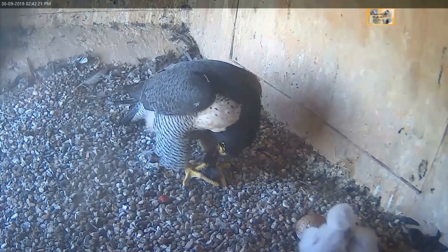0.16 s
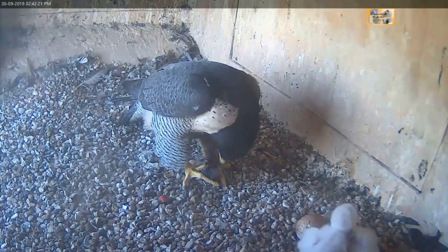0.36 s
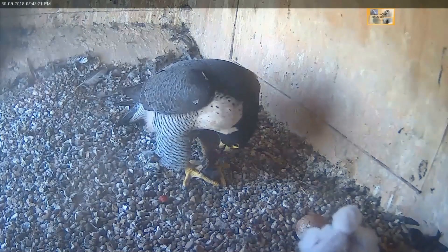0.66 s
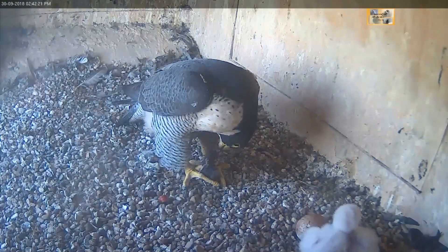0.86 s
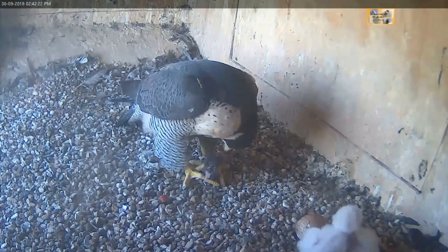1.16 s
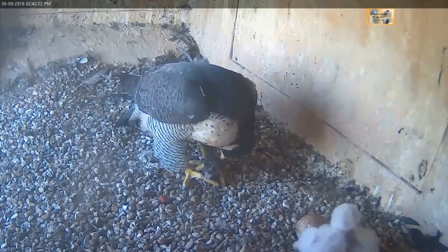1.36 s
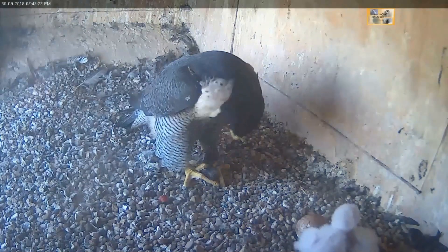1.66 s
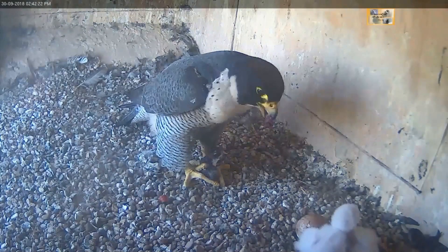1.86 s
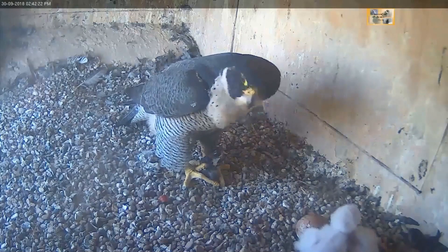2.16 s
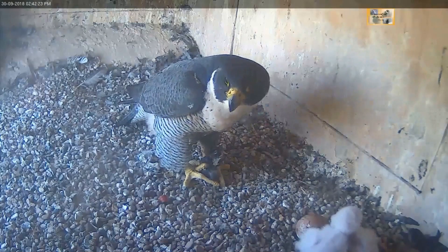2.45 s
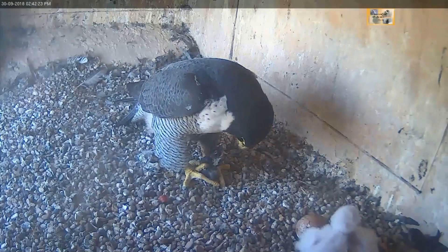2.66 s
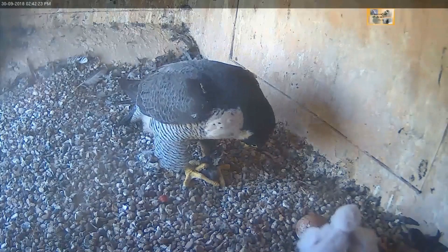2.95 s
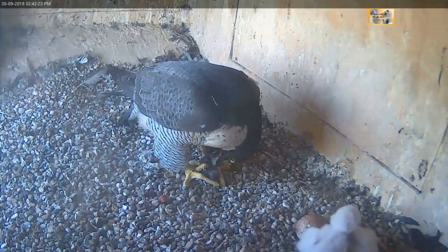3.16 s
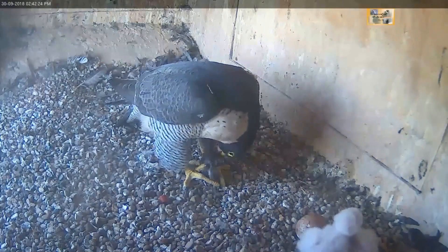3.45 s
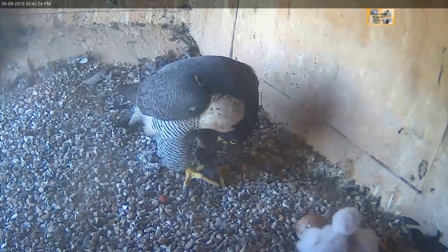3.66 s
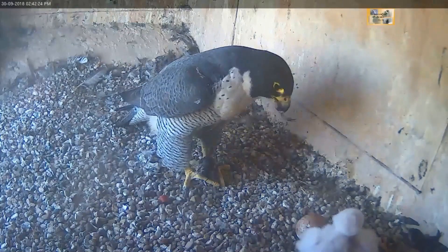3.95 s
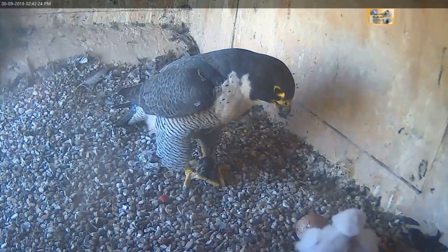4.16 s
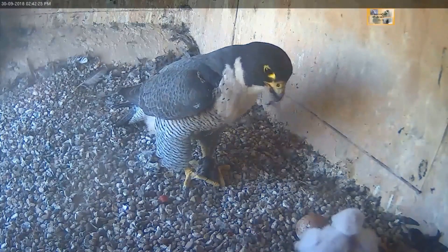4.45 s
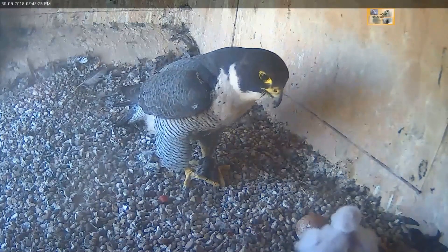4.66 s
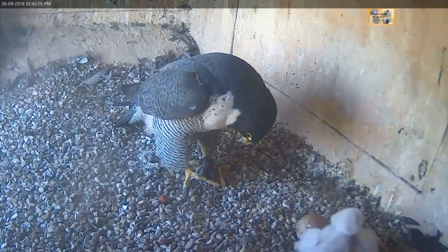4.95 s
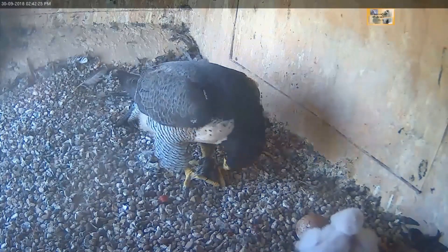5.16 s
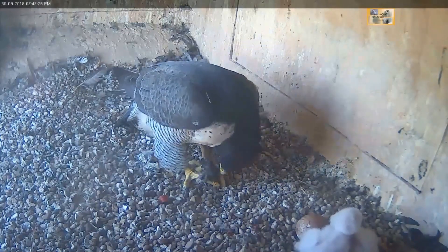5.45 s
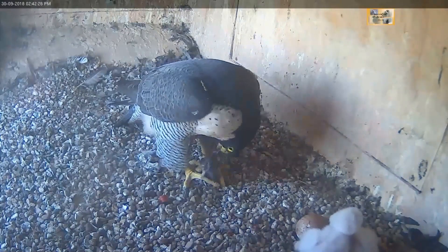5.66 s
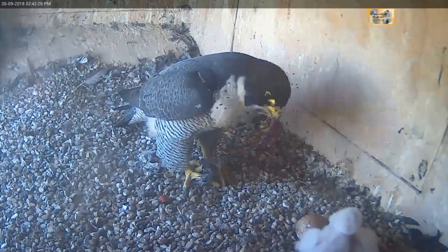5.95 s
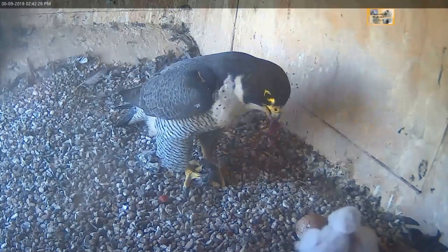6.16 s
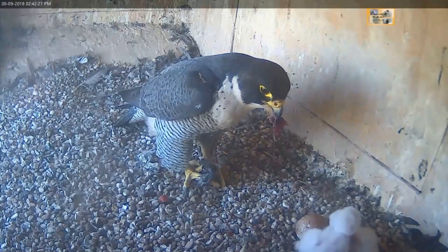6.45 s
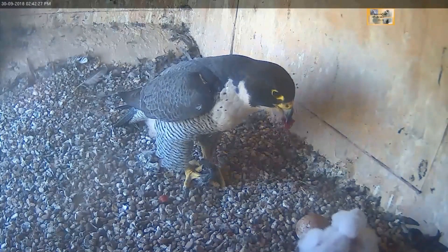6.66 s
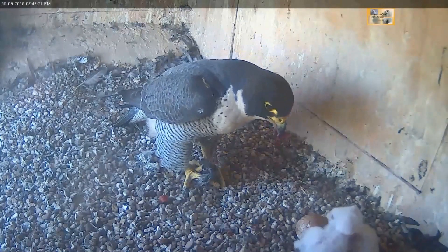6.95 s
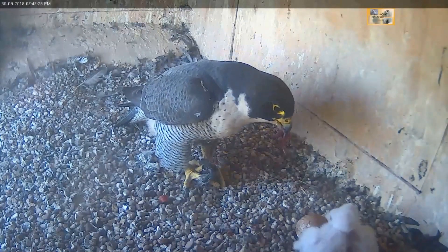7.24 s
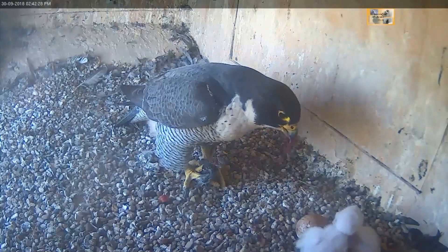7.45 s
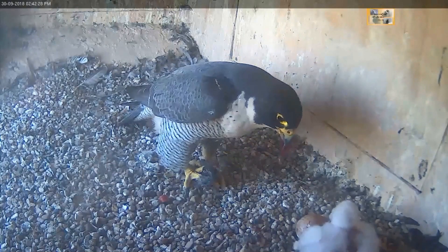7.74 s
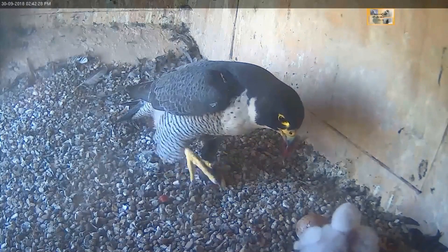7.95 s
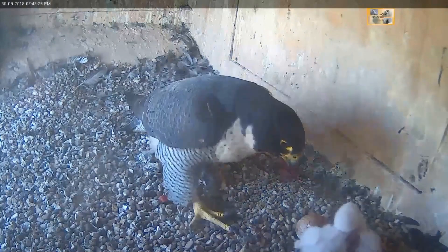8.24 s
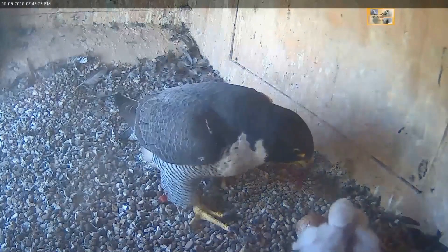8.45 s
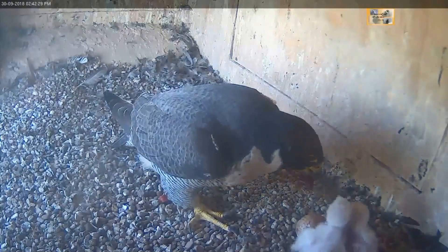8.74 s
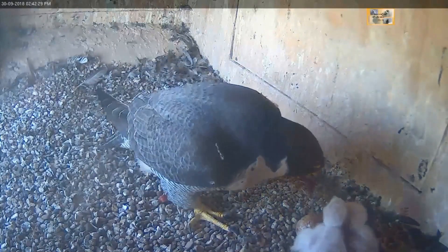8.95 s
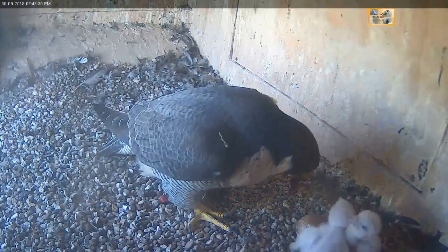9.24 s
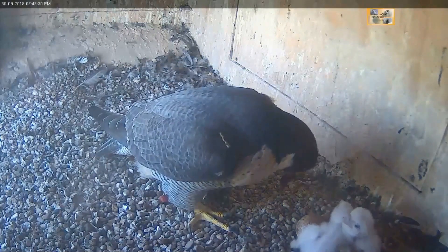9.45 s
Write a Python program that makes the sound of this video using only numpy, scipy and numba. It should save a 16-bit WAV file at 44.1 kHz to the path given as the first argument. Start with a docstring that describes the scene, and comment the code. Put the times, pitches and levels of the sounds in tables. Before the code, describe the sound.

Inside a wooden nest box, small chicks beg with brief, high, slightly rough cheeps above steady low rumble, hiss and a thin high whine. The mother falcon's tugs at prey shake and thump the floor, with tiny beak and pebble clicks. After six seconds she gives loud, rasping, whistling chups that ring close to the small microphone; then a foot scuffs gravel while the cheeping continues.

```python
"""A falcon feeds her downy chicks in a wooden nest box, heard by the box's small camera.
From the start the chicks beg in arching two-voiced cheeps over a steady rumble, hiss and thin whine.
Her tugs at the prey shake and thump the floor, with small clicks of beak and pebbles.
Past 6 s come three loud chups, pulsed rasps with whistles: the housing rings, the camera's gain ducks.
Last, her foot drags through the gravel, and the chicks cheep on while the gain slowly recovers."""
import sys
import numpy as np
from scipy import signal
from scipy.fft import rfft, irfft
from scipy.io import wavfile
from numba import njit

SR = 44100
rng = np.random.default_rng(int(sys.argv[2]) if len(sys.argv) > 2 else 0)


def persist_wave(psi):
    """Save psi, clipped to +-1, as 16-bit WAV."""
    counts = np.round(np.clip(psi, -1, 1) * 32767).astype(np.int16)
    wavfile.write(sys.argv[1], SR, np.atleast_2d(counts).T)


N = 423360  # samples, 9.6 s


def undb(db):
    """Decibels to amplitude gain."""
    return 10 ** (np.asarray(db) / 20)


def unit(x):
    """Scale to rms 1."""
    return x / np.sqrt(np.mean(x ** 2))


def span(length_s):
    """Sample times [s] over a length."""
    return np.arange(int(length_s * SR)) / SR


def add(out, start_s, x):
    """Mix a sound in at a time, cut at the end of the scene."""
    i = int(start_s * SR)
    out[i:i + len(x)] += x[:len(out) - i]


def noise(size):
    """White noise, spread 1."""
    return rng.standard_normal(size)


def colour(x, points):
    """Filter by a (frequency [Hz], gain [dB]) curve, straight on a log frequency axis."""
    hz, db = np.transpose(points)
    f = np.maximum(np.fft.rfftfreq(len(x), 1 / SR), 1)
    gain = undb(np.interp(np.log(f), np.log(hz), db))
    return irfft(rfft(x) * gain, len(x))


def resonate(x, hz, width_hz):
    """One resonance, gain 1 at its centre."""
    return signal.lfilter(*signal.iirpeak(hz, hz / width_hz, fs=SR), x)


def flutter(size, rate_hz):
    """Low-passed noise, rms 1: a smooth random wander."""
    lowpass = signal.butter(2, rate_hz, fs=SR, output="sos")
    settled = signal.sosfilt(lowpass, noise(size + SR // 10))[-size:]
    return unit(settled)


def fade(t, t60_s):
    """Exponential decay, -60 dB at t60."""
    return np.exp(-np.log(1000) * t / t60_s)


def envelope(t, attack_s, hold_s, t60_s):
    """Linear attack, hold and exponential release."""
    return np.clip(t / attack_s, 0, 1) * fade(np.maximum(t - attack_s - hold_s, 0), t60_s)


def ring(modes, length_s):
    """Impulse response of a set of modes: a sum of decaying sines."""
    t = span(length_s)
    return sum(undb(db) * fade(t, t60_s) * np.sin(2 * np.pi * hz * t) for hz, db, t60_s in modes)


def box(x, wet_db, t60_s):
    """Direct sound plus the quick, dense echoes of the close walls: decaying noise after 2 ms."""
    t = span(t60_s)
    echoes = noise(len(t)) * fade(t, t60_s) * (t > .002)
    echoes = echoes / np.linalg.norm(echoes)
    return x + undb(wet_db) * signal.fftconvolve(x, echoes)[:len(x)]


def voice(hz, jitter, shimmer, overtone_db, slope_db, flutter_hz):
    """One vibrating membrane of the syrinx: a wavering tone with overtones 2 to 5."""
    wavering_hz = hz * (1 + jitter * flutter(len(hz), flutter_hz))
    phase = 2 * np.pi * np.cumsum(wavering_hz) / SR
    overtones = sum(undb(overtone_db + slope_db * (k - 3)) * np.sin(k * phase) * (k * hz < SR / 4)
                    for k in range(2, 6))
    return np.sqrt(2) * (np.sin(phase) + overtones) * (1 + shimmer * flutter(len(hz), flutter_hz))


# chick cheeps: (time [s], rise [s], fall [s], tail [s], top [Hz], end [Hz],
# relative level [dB], roughness [0-1])
CHICK_CHEEPS = [ (.128, .034, 0.026, 0.029, 5800, 1850, -34, 0.14),
                (.506, .039, 0.025, .020, 5950, 1910, -30.5, 0.13),
                (.819, .029, 0.025, 0.045, 5600, 1440, -34, 0.43),
                (.982, .021, .025, 0.03, 5850, 2020, -32.5, 0.2),
                (1.565, .022, 0.021, 0.021, 5250, 1910, -35, 0.33),
                (2.129, .027, 0.023, 0.021, 5650, 1860, -32.5, 0.25),
                (2.581, .054, 0.02, 0.024, 5600, 1800, -34.5, .3),
                (2.885, .043, 0.04, 0.04, 5650, 1785, -36, 0.68),
                (2.999, .045, .027, 0.018, 3850, 2020, -36, .08),
                (3.046, .025, 0.025, .020, 5650, 1810, -33.5, .35),
                (3.384, .054, 0.031, 0.041, 5600, 1693, -34, 0.64),
                (3.619, .023, .020, 0.022, 5250, 2180, -33.5, 0.36),
                (3.967, .026, 0.032, 0.049, 5600, 1663, -30, 0.5),
                (4.053, 0.026, 0.015, 0.023, 4800, 2100, -37, 0.37),
                (4.583, .031, 0.03, 0.047, 5600, 1482, -31.5, 0.38),
                (4.706, .027, 0.017, 0.021, 4950, 1780, -35.5, .29),
                (5.173, .030, 0.038, 0.045, 5500, 1440, -33.5, 0.47),
                (5.573, .028, .017, 0.033, 4500, 1630, -37.5, .08),
                (6.183, .029, 0.02, 0.027, 5350, 1720, -35.5, 0.2),
                (6.752, .046, 0.023, 0.034, 5500, 1632, -34, 0.54),
                (7.181, .057, 0.017, 0.011, 5600, 2250, -33.5, 0.4),
                (7.208, .057, 0.027, .041, 5700, 1713, -35, .7),
                (7.332, .030, .016, .014, 3410, 2020, -34.5, 0),
                (7.515, .043, .020, .014, 5700, 1860, -32.5, .22),
                (7.687, .051, 0.036, 0.04, 5700, 1678, -32.5, 0.63),
                (7.929, .029, 0.024, 0.022, 6200, 1573, -30, .28),
                (8.146, .044, 0.031, 0.036, 5800, 1444, -31, 0.49),
                (8.366, .022, 0.025, .024, 5950, 1950, -31, 0.19),
                (8.745, .040, .025, 0.042, 5200, 1516, -31.5, 0.48),
                (8.819, .032, 0.017, 0.025, 5950, 1310, -26.5, .3),
                (9.361, .040, .031, 0.034, 6100, 1380, -25, .29),
                (9.429, .025, 0.029, 0.062, 5800, 1502, -30.5, 0.34)]
# chick's throat and open beak: (frequency [Hz], gain [dB])
BEAK_RESPONSE = [(800, -8.5), (1500, 7), (2300, -8.5), (3000, 5), (4500, -9), (5700, -1.5), (6800, -2.5),
                 (8000, -33)]


def chicks():
    """All the cheeps, coloured by throat and beak, echoing from the far corner of the box."""
    out = np.zeros(N)
    for start_s, *shape in CHICK_CHEEPS:
        add(out, start_s, cheep(*shape))
    return undb(-4.5) * box(colour(out, BEAK_RESPONSE), wet_db=-0.5, t60_s=0.058)


BREAK_HZ, LOW_VOICE_HZ = 3002, 4154  # pitch between fall and tail; mean ceiling of the slacker side
# start pitch as a share of the top: the longer the rise, the lower it starts
CHEEP_START_SHARE, START_SHARE_PER_S = .70, 4.2
CLEAN_TAIL_DB, ROUGH_TAIL_DB = -18, 16.5  # at roughness 0 and 1: harsh cries hold on longer
# slacker side: level, wander of its ceiling (share); unevenness of both sides
SLACK_SIDE_DB, SLACK_WANDER, PATCHY_DB = -6.5, 0.0397, 2.5


def cheep(rise_s, fall_s, tail_s, top_hz, end_hz, db, rough):
    """Pitch arches up and drops to a low tail; under strain the syrinx's sides part and turn harsh."""
    top_s, fall_end_s, end_s = np.cumsum([rise_s, fall_s, tail_s])
    t = span(end_s)
    crest_s = top_s - .016 * rough  # a harsh cry tops out early and holds there

    start_hz = top_hz * (CHEEP_START_SHARE - START_SHARE_PER_S * rise_s)
    climb = np.sin(np.pi / 2 * np.clip(t / crest_s, 0, 1)) ** 1.6
    rise = start_hz + (top_hz - start_hz) * climb
    drop = top_hz - (top_hz - BREAK_HZ) * np.clip((t - top_s) / fall_s, 0, 1) ** 1.45
    tail = end_hz + (BREAK_HZ - end_hz) * np.exp(-np.maximum(t - fall_end_s, 0) / .0095)
    hz = np.where(t < top_s, rise, np.where(t < fall_end_s, drop, tail))

    # the slacker side cannot follow to the top
    limit_hz = LOW_VOICE_HZ * (1 + SLACK_WANDER * flutter(len(t), 29.8))
    low_hz = hz / (1 + (hz / limit_hz) ** 8) ** (1 / 8)

    strain = np.interp(t, [0, top_s, fall_end_s, fall_end_s + .022], [0.15, 1, 1.4, 0.093])
    rough_strain = rough * strain
    high = voice(hz, 0.0025 + 0.078 * rough_strain, 0.41 * rough_strain,
                 overtone_db=-7, slope_db=-1.5, flutter_hz=750)
    low = voice(low_hz, .005 + .09 * rough_strain, .5 * rough_strain,
                overtone_db=-13, slope_db=-6, flutter_hz=600)
    high_patches = undb(PATCHY_DB * flutter(len(t), 120))
    low_patches = undb(SLACK_SIDE_DB + PATCHY_DB * flutter(len(t), 120))
    tones = high * high_patches + strain * low * low_patches

    # chaotic vibration fills the gaps between the tones
    chaos = unit(colour(noise(len(t)), [(900, -24), (1600, -3), (2300, -2), (3000, -2.5),
                                        (5800, -0.5), (7500, -6.5)]))
    harsh = rough ** 2 * np.interp(t, [crest_s - .02, crest_s, fall_end_s, fall_end_s + 0.022],
                                   [0, 1, 1, 0])

    # blooms near the top, and again at the break
    tail_db = CLEAN_TAIL_DB + (ROUGH_TAIL_DB - CLEAN_TAIL_DB) * rough
    effort_db = np.interp(
        t, [0, crest_s - .010, crest_s - .005, top_s + 0.0023, (top_s + fall_end_s) / 2,
            fall_end_s, (fall_end_s + end_s) / 2, end_s],
        [-4, -7, 1, 0, -3.5, -1, tail_db, tail_db - 11.5])
    edges = np.clip(np.minimum(t, end_s - t) / 0.006, 0, 1)
    return (tones + undb(4.5) * harsh * chaos) * edges * undb(db + effort_db)


# mother's rasps: (time [s], attack [s], hold [s], t60 [s], throat level [dB], chest level [dB],
# mean pulse rate [Hz], throat tilt [dB per octave])
MOTHER_RASPS = [ (6.344, 0.0034, .020, .11, -12, -14.5, 306.4, 0.5),
                (6.555, .002, .012, .2, -26, -29.5, 300, 6),
                (6.602, 0.019, .006, .065, -3, -26.5, 303.4, 5),
                (6.642, 0.0073, .002, .05, -14.5, -7, 294.7, -5),
                (7.352, 0.0074, .010, 0.061, -3, -6.5, 324.3, -5)]
# whistles her voice flips into: (time [s], attack [s], hold [s], start [Hz], end [Hz],
# start level [dB], swell [dB])
MOTHER_WHISTLES = [ (6.377, .004, .018, 3200, 2956, -26.5, 10), (6.556, .002, .008, 2195, 2155, -27, -2.5),
                   (6.56, .006, .033, 4080, 4670, -23, 11), (6.604, .003, 0.016, 2974, 2811, 9, -11),
                   (6.613, .004, .008, 2015, 1894, -4.5, 0.5), (6.628, .004, .020, 1714, 1400, -18.5, 0.5),
                   (7.385, .006, 0.019, 3356, 2945, -0.5, -5.5)]
# camera housing modes: (frequency [Hz], relative level [dB], t60 [s])
HOUSING_MODES = [(288.5, -1.5, 1.1), (1047, -10.5, 1.1), (1440, -6, 1.), (1523, -6, 1.4), (1820, -12, 1.3),
                 (1955, -6.5, 1.2), (2140, -9, 1.1), (2840, -16.5, 1.3), (2907, -20.5, 1.5),
                 (3355, -7.5, 1.3)]


def mother():
    """Her chups, rasps and whistles, close to the camera and loud enough to ring its housing."""
    out = np.zeros(N)
    for start_s, *shape in MOTHER_RASPS:
        add(out, start_s, rasp(*shape))
    for start_s, *shape in MOTHER_WHISTLES:
        add(out, start_s, whistle(*shape))
    housing = signal.fftconvolve(out, ring(HOUSING_MODES, 1.5))[:N]
    # the housing's many weaker modes blur into a soft tail
    blur = box(out, wet_db=3, t60_s=1.8) - out
    late = colour(blur, [(150, -18.5), (300, 5), (600, -9), (1400, 2), (3200, -12.5),
                         (4300, -13.5), (7000, -24.5)])
    return box(out, wet_db=-12, t60_s=0.043) + undb(-82.5) * housing + undb(-26.5) * late


# mother's throat resonances: (frequency [Hz], width before narrowing [Hz], gain before tilt [dB])
THROAT_RESONANCES = [(403, 30, -4), (1033, 380, -13.5), (1422, 92, 4.5), (1530, 65, 2.5), (1852, 56, 0.5),
                     (1957, 90, 3.5), (2190, 580, -3), (2826, 1100, -3.5), (3470, 460, -20.5),
                     (4500, 450, -20.5), (5800, 190, -15), (5780, 260, -12.5), (6920, 360, -18.5)]
THROAT_NARROWING = 0.92
CHEST_T60_S = 0.077
# noise-to-pulse ratio at the start; time in which it grows by 1
RASP_BREATH, BREAKUP_S = .25, 0.0062


def rasp(attack_s, hold_s, t60_s, db, chest_db, pulse_hz, tilt_db, opening_db=14, opening_s=.015):
    """Uneven slow pulses thud in the chest and rasp through the throat, soon breaking up into noise."""
    t = span(attack_s + hold_s + t60_s)
    cycles = np.cumsum(pulse_hz * (1 + 0.069 * flutter(len(t), 250))) / SR
    pulses = np.diff(np.floor(cycles), prepend=-1) * undb(2 * flutter(len(t), 300))
    puffs = np.exp(-(cycles % 1) / 0.67) * noise(len(t))
    breath = np.minimum(RASP_BREATH + t / BREAKUP_S, 2)
    drive = (unit(pulses) + breath * unit(puffs)) / np.hypot(1, breath)

    # dull at first, brighter as the beak opens
    shut = np.maximum(1 - t / opening_s, 0)
    throat = np.zeros(len(t))
    for hz, width_hz, peak_db in THROAT_RESONANCES:
        width_hz = THROAT_NARROWING * width_hz
        resonance = resonate(resonate(drive, hz, width_hz), hz, width_hz)
        muffle_db = opening_db * shut * max(np.log2(hz / 2000), 0)
        throat += undb(peak_db + tilt_db * np.log2(hz / 1000) - muffle_db) * resonance

    chest = np.sqrt(2) * np.sin(2 * np.pi * cycles) * envelope(t, attack_s, .003, CHEST_T60_S)
    return undb(db) * unit(throat) * envelope(t, attack_s, hold_s, t60_s) + undb(chest_db) * chest


WHISTLE_T60_S = .025


def whistle(attack_s, hold_s, start_hz, end_hz, db, swell_db):
    """A nearly pure tone that glides, swells or sags, and breaks off."""
    t = span(attack_s + hold_s + WHISTLE_T60_S)
    progress = np.minimum(t / (attack_s + hold_s), 1)
    hz = start_hz + (end_hz - start_hz) * progress
    tone = voice(hz, 0.014, .18, overtone_db=-23, slope_db=-4.5, flutter_hz=386)
    return tone * envelope(t, attack_s, hold_s, WHISTLE_T60_S) * undb(db + swell_db * progress)


# box floor modes: (frequency [Hz], relative level [dB], t60 [s])
FLOOR_MODES = [(41.3, 2.5, 0.46), (52.4, -4.5, 0.12), (82.5, -10, 0.22), (110, -8, 0.097),
               (164.3, -6, 0.27), (235, -7.5, 0.051), (275, -3, 0.099)]
# long pulls at the prey: (time [s], hold [s], level [dB])
PREY_PULLS = [(0, 0.029, -31.5), (.2, 0.24, -30.5), (0.694, 0.48, -29.5), (1.523, 0.29, -30.5),
              (1.997, 1.34, -42), (3.638, 0.46, -30), (4.3, 1.5, -48.5), (5.72, 0.24, -35.5),
              (6.05, .2, -41.5)]
# tugs that jolt the floor: (time [s], peak level [dB], push length [s])
FLOOR_JOLTS = [(.815, -23, 0.0089), (1.684, -20.5, 0.002), (1.697, -19.5, 0.005), (1.77, -25, 0.011),
               (3.673, -19.5, 0.0018), (3.682, -11.5, 0.0032), (3.750, -10.5, 0.0072),
               (5.727, -19.5, 0.0038), (5.747, -15.5, 0.0041), (5.776, -17.5, 0.0068)]
# beak snaps and shifted pebbles: (time [s], level before decay [dB], t60 [s])
BEAK_TICKS = [(1.688, -46.5, 0.15), (3.749, -32.5, 0.034), (5.005, -47.5, 0.035), (5.674, -52, .02),
              (5.694, -48, 0.091), (6.289, -47.5, 0.13)]
PULL_ATTACK_S, PULL_T60_S = .05, .6
STANDING_DB = -53.5  # standing still, she barely stirs the floor


def feeding():
    """Pulling shakes the floor modes with noise, each jolt rings them, and beak and pebbles click."""
    force = colour(noise(N), [(18, -19), (36, 0), (90, 2), (160, -8), (300, -16.5), (700, -22)])
    shake = unit(signal.fftconvolve(force, ring(FLOOR_MODES, 0.69))[:N])
    t = np.arange(N) / SR
    pulls = [undb(db) * envelope(t - start_s, PULL_ATTACK_S, hold_s, PULL_T60_S)
             for start_s, hold_s, db in PREY_PULLS]
    out = shake * np.maximum(np.max(pulls, axis=0), undb(STANDING_DB))

    for start_s, db, push_s in FLOOR_JOLTS:
        push = np.sin(np.pi * span(push_s) / push_s) ** 2
        thump = signal.fftconvolve(ring(FLOOR_MODES, .8), push)
        add(out, start_s, undb(db) * thump / np.abs(thump).max())

    t = span(0.12)
    for start_s, db, t60_s in BEAK_TICKS:
        crack = unit(colour(noise(len(t)), [(500, -27), (1500, 2), (2300, -9.5), (3000, 3),
                                            (4500, -11), (6000, 7), (8000, -6), (11000, -35.5)]))
        add(out, start_s, undb(db) * crack * fade(t, t60_s))
    return out


# foot drags through the gravel: (time [s], attack [s], t60 [s], level [dB])
FOOT_DRAGS = [(7.842, 0.033, 0.5, -39.5)]


def step():
    """A dull, uneven scuff of talons on gravel: low-coloured noise with a fluttering level."""
    scuff = unit(colour(noise(N), [(80, -27), (290, 7), (430, 3), (630, -14), (950, -11),
                                   (2000, -24), (6000, -42)]))
    t = np.arange(N) / SR
    drag = sum(undb(db) * envelope(t - start_s, attack_s, 0, t60_s)
               for start_s, attack_s, t60_s, db in FOOT_DRAGS)
    return scuff * drag * undb(3.35 * flutter(N, 40))


# air and building rumble, before the slow waver: (frequency [Hz], density [dB per Hz])
AIR_SPECTRUM = [(24, -86.5), (48, -57), (100, -62), (150, -69), (225, -78), (295, -65), (345, -72),
                (460, -86), (620, -91.5), (900, -88.5), (1500, -93), (2200, -100), (4000, -102),
                (7000, -99)]
WHINE_HZ, WHINE_SPREAD_HZ, WHINE_DB = 7252, 43, -56


def background(waver_db=2.02):
    """Rumble and hiss from coloured noise, with the camera's thin, wavering whine on top."""
    density_scale = np.sqrt(SR / 2)  # white noise to 0 dB per Hz
    air = colour(noise(N), AIR_SPECTRUM) * density_scale * undb(waver_db * flutter(N, 3))
    whine_hz = WHINE_HZ + WHINE_SPREAD_HZ * flutter(N, 62)
    whine = np.sin(2 * np.pi * np.cumsum(whine_hz) / SR)
    return air + undb(WHINE_DB) * unit(whine)


def scene():
    """Everything in the box, at one microphone."""
    return (chicks() + mother() + feeding() + step() + background())[None]


@njit
def follow(x, attack, release):
    """Envelope that rises fast and sinks slowly; attack and release are shares per sample."""
    out, e = np.empty(len(x)), 0.
    for i in range(len(x)):
        e += (abs(x[i]) - e) * (attack if abs(x[i]) > e else release)
        out[i] = e
    return out


CAMERA_TOP_HZ, OUTPUT_TOP_HZ = 7500, 15600  # low-pass before the gain control; after clipping


def record(dry, threshold_db=-14.5, attack_s=0.0014, release_s=3.9):
    """Narrow-band camera: 2:1 gain control ducks fast, recovers slowly; the loudest peaks clip."""
    x = signal.sosfilt(signal.ellip(12, .2, 80, CAMERA_TOP_HZ, fs=SR, output="sos"), dry[0])
    # the gain control hardly hears the rumble
    sensed = signal.sosfilt(signal.butter(2, 150, "high", fs=SR, output="sos"), x)
    loudness = follow(sensed, 1 / (attack_s * SR), 1 / (release_s * SR))
    ducking = np.sqrt(np.maximum(loudness / undb(threshold_db), 1))
    x = np.clip(x / ducking, -1, 1)
    return signal.sosfilt(signal.ellip(8, .2, 70, OUTPUT_TOP_HZ, fs=SR, output="sos"), x)[None]


dry = scene()
out = record(dry)
persist_wave(out)
```